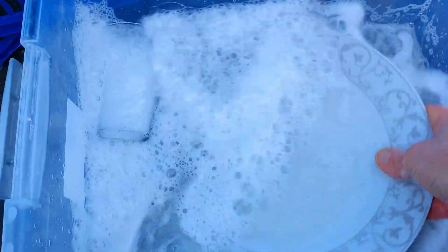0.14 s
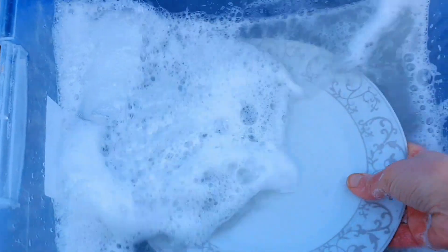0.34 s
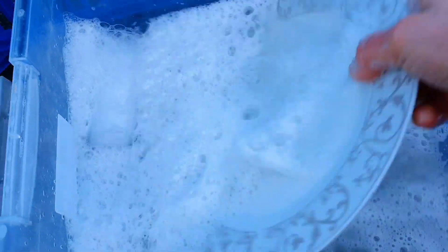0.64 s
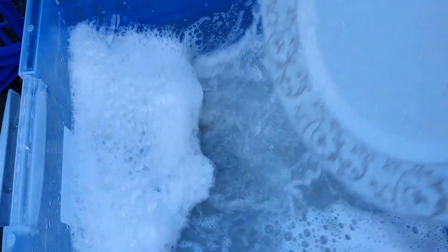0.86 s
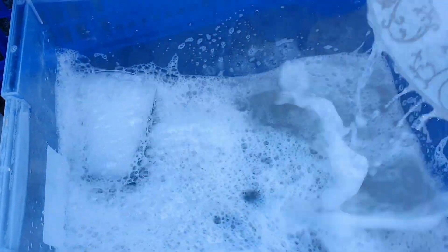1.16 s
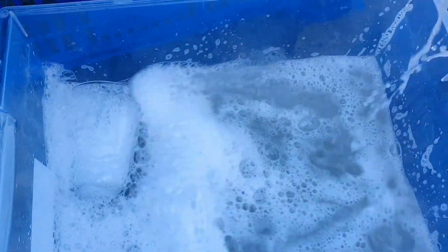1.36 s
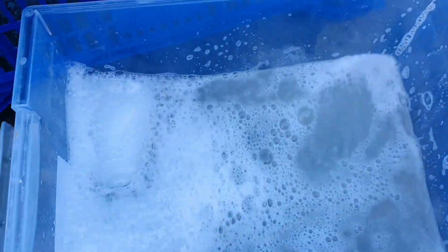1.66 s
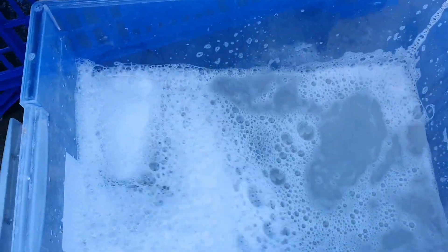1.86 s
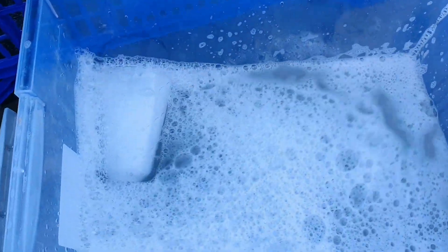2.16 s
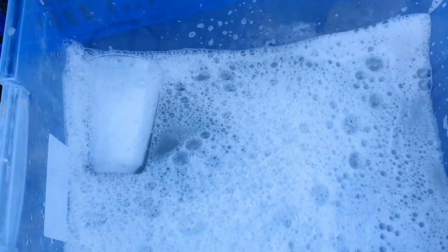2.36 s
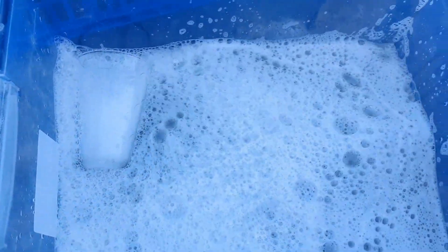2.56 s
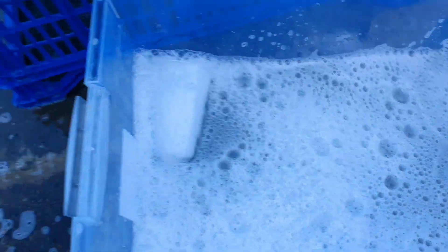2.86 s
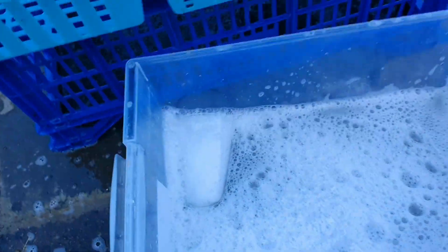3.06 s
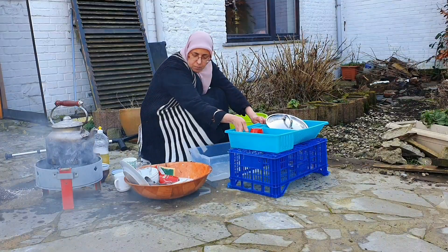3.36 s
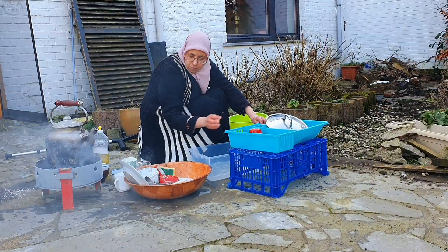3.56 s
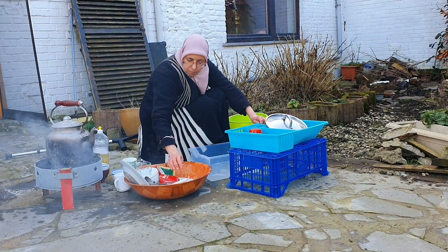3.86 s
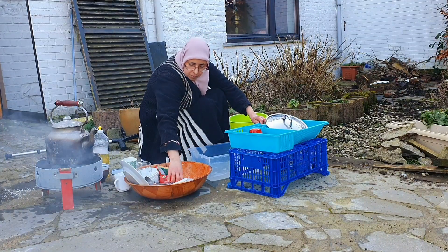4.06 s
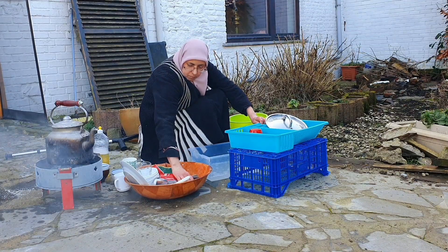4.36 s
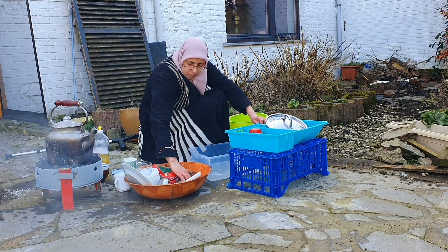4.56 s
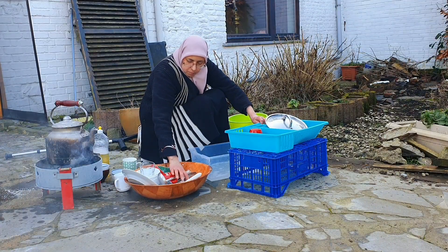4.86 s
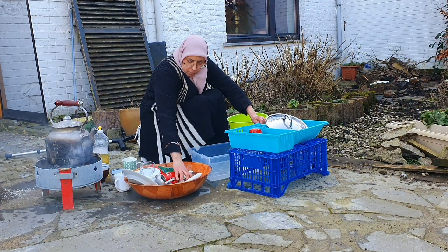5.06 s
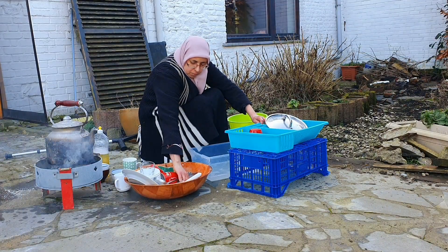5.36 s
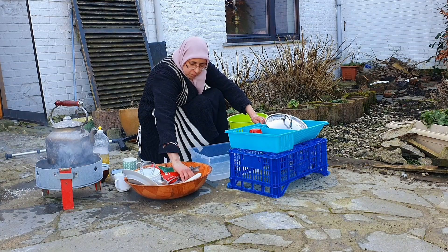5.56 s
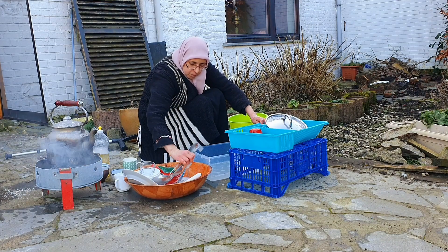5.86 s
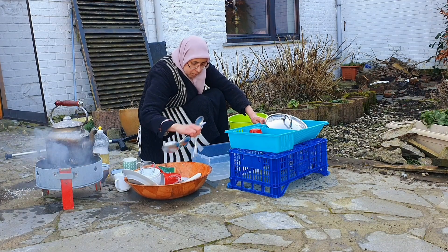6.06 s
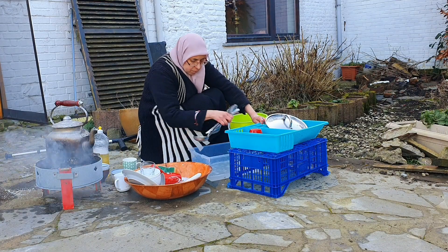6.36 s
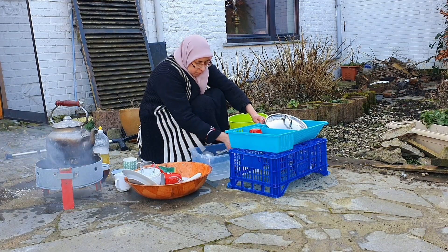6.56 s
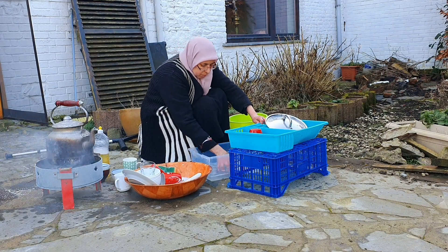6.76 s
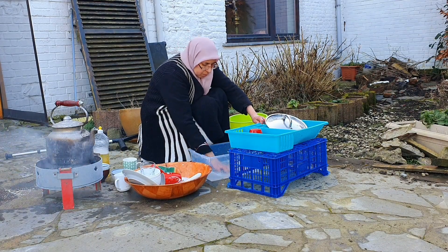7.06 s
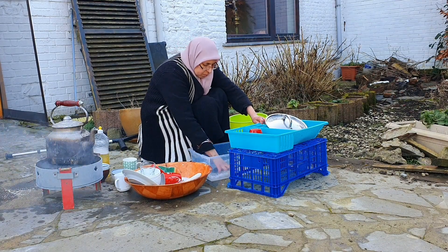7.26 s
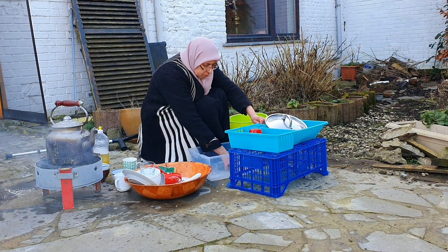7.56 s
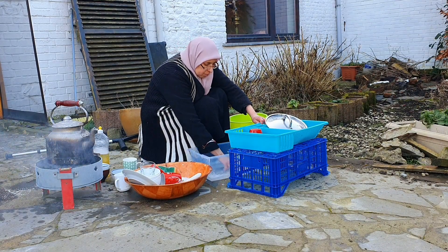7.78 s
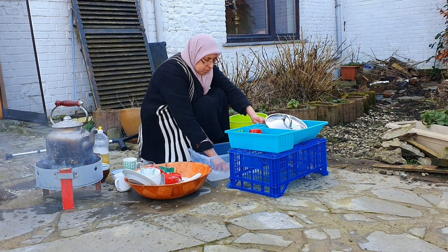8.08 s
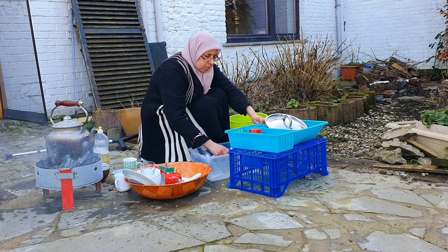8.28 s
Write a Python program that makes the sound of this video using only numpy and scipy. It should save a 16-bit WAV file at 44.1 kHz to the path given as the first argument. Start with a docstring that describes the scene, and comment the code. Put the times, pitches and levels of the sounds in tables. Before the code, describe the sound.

Soapy water sloshes and drips in a plastic tub as dishes are washed outdoors, with crockery clinking and cutlery jingling lightly.

```python
"""Dishes washed by hand in a paved yard, over a low machine hum and a faint hiss. First, soapy water
sloshes and slaps in a plastic tub. Near 2 s a far bird whistles, a cup is set down, a plate rattles onto
the stack and handled plastic gives hollow taps. From 4 s the water stirs again while cutlery scrapes and
jingles in a metal bowl; after 6 s come more slaps, plopping air pockets and a run of drips.
Water is fluttering noise and bubbles; crockery and steel are modes rung by a chatter of tiny contacts."""
import sys
import numpy as np
from scipy import signal
from scipy.fft import rfft, irfft, next_fast_len
from scipy.io import wavfile
from scipy.ndimage import uniform_filter1d, map_coordinates

SR = 44100
rng = np.random.default_rng(int(sys.argv[2]) if len(sys.argv) > 2 else 0)


def output_pcm(signal):
    """Save a mono or channel-first signal as 16-bit PCM at the path in sys.argv[1].

    Samples are clipped to [-1, 1] before scaling.
    """
    pcm = np.clip(np.atleast_2d(signal).T, -1, 1) * 32767
    wavfile.write(sys.argv[1], SR, np.round(pcm).astype(np.int16))


N = 371322

# spectra of the water's body, its fine spray and the tub's boom: f/Hz, level/dB
SLOSH_EQ = [(180, -23), (300, -5), (757, -1), (2140, -3), (4810, -8), (6580, -18), (9000, -47.5)]
SPRAY_EQ = [(3000, 0.5), (5000, -1.5), (7000, 2), (11000, -8.5), (15000, -10.5)]
BOOM_EQ = [(50, 2), (90, 3.5), (250, 3), (400, -0.5), (700, -29.5)]
# ringing modes of the cutlery: f/Hz, level/dB
STEEL_MODES = [(1850, -16), (4080, -18), (5770, -15), (6700, -12), (8980, -10), (9890, -10), (10460, -7),
               (12100, -6), (13700, -10), (14690, -7), (15400, -9)]


def amp(db):
    """Gain of a level in dB."""
    return 10 ** (np.asarray(db) / 20)


def unit(x):
    """Scaled to rms 1."""
    return x / np.sqrt(np.mean(x ** 2) + 1e-20)


def along(points, hz):
    """Read a curve of (f/Hz, value) points on a log frequency axis."""
    f, values = np.transpose(points)
    return np.interp(np.log(hz + 1), np.log(f + 1), values)


def curves(rows):
    """One automation curve for each column after the time."""
    times, *columns = np.transpose(rows)
    return [np.interp(np.arange(N) / SR, times, column) for column in columns]


def wobble(rate):
    """A smooth random curve, rate knots a second."""
    return map_coordinates(rng.standard_normal(int(N * rate / SR) + 4), [np.arange(N) * rate / SR])


def filtered(x, response):
    """Equalise x with a gain given as a function of frequency."""
    size = next_fast_len(x.shape[-1] + 4096)
    return irfft(rfft(x, size) * response(np.fft.rfftfreq(size, 1 / SR)), size)[..., :x.shape[-1]]


def add_at(track, s, sound):
    """Mix a stereo sound into the track at s seconds."""
    track[:, round(s * SR):][:, :sound.shape[1]] += sound


def spread(pair, eq):
    """Colour two unrelated signals and mix them to stereo, narrow in the bass, wider above; rms 1."""
    likeness = [(100, 0.91), (400, 1), (1500, 0.22), (6000, 0.48)]  # stereo image: f/Hz, left-right correlation

    def mid_side_gains(hz):
        angle = np.arccos(np.clip(along(likeness, hz), -1, 1)) / 2
        return amp(along(eq, hz)) * [np.cos(angle), np.sin(angle)]

    mid, side = filtered(pair, mid_side_gains)
    return unit(np.array([mid + side, mid - side]))


def puff(hold_s, eq):
    """A stereo burst of coloured noise: sudden attack, short hold, quick fall."""
    t = np.arange(SR // 8) / SR
    envelope = np.exp(-t / hold_s - (t / hold_s / 2) ** 2) * (1 - np.exp(-t / 0.00016))
    return spread(rng.standard_normal((2, len(t))), eq) * envelope


def patchy(depth_db):
    """Two noises sharing patches of random gain in time and frequency."""
    spectra = signal.stft(rng.standard_normal((2, N)), nperseg=256)[2]
    patches = uniform_filter1d(rng.standard_normal(spectra.shape[1:]), size=4, axis=0)
    patches = uniform_filter1d(patches, size=6, axis=1)
    return signal.istft(spectra * amp(depth_db * unit(patches)), nperseg=256)[1][:, :N]


def spikes(per_s, height):
    """Gain that jumps for a few milliseconds at each random droplet or contact."""
    chance, strength = rng.random((2, N))
    jumps = (chance < per_s / SR) * height * strength ** 2
    return 1 + signal.lfilter([1], [1, -np.exp(-1 / (0.0068 * SR))], jumps)


def yard():
    """The bed: steady hiss and rumble of the yard."""
    air_eq = [(25, -21.5), (71, 4), (107, -9), (235, -15.5), (362, -33.5), (603, -30.5), (4750, -35),
              (11000, -61), (14300, -99)]  # outdoor air: f/Hz, level/dB
    return amp(-49 + 0.44 * wobble(0.27)) * spread(rng.standard_normal((2, N)), air_eq)


def bird():
    """One far, falling whistle."""
    glide = [(1.66, 3850, -65.5), (1.75, 3730, -59.5), (1.85, 3320, -81)]  # path of the whistle: t/s, f/Hz, level/dB
    hz, db = curves([(0.029, glide[0][1], -150)] + glide + [(1.9, glide[-1][1], -150)])
    return amp(db) * np.sin(2 * np.pi * np.cumsum(hz) / SR)


def hum():
    """A machine drones on a slightly wandering pitch, a touch to the right."""
    fader = [(0, -38), (1.2, -46), (3.05, -47), (3.25, -42), (6.3, -41), (8.42, -39.5)]  # loudness of the drone: t/s, level/dB
    partials = [(59.8, 2), (119.6, -7), (181, -13)]  # its tones: f/Hz, level/dB
    warped_t = np.cumsum(1 + 0.0084 * wobble(4.5)) / SR
    tones = sum(amp(db + 0.56 * wobble(13.0)) * np.sin(2 * np.pi * hz * warped_t) for hz, db in partials)
    return amp(curves(fader)[0]) * tones * amp([[-.5], [.6]])


def wall(x):
    """Short reverb off wall and paving; the lows hang on longest."""
    decay = [(200, 0.24), (2000, 0.082), (10000, 0.077)]  # reverb time: f/Hz, t60/s
    hz, t, spectra = signal.stft(rng.standard_normal((2, SR // 3)), SR, nperseg=256)
    tail = signal.istft(spectra * amp(-60 * t / along(decay, hz)[:, None]), SR, nperseg=256)[1]
    predelayed = np.pad(x, ((0, 0), (400, 0)))
    return signal.fftconvolve(predelayed, tail / np.linalg.norm(tail[0]), axes=1)[:, :N]


def panned(x):
    """The work moves from side to side: level and arrival time differ between left and right."""
    moves = [(0, -0.5, 3.5), (.9, 0.5, 2.5), (1.5, -3.5, 14.5), (2.9, -3.5, 12.5), (3.6, 2.5, 7),
             (4, 0.5, -4), (6, 0, 3), (8.42, -0.3, -3.5)]  # position: t/s, left over right/dB, left lag/samples
    pan_db, lag = curves(moves)
    n = np.arange(N)
    return np.array([amp(side * pan_db / 2) * map_coordinates(channel, [n - side * lag / 2], order=3)
                     for channel, side in zip(x, (1, -1))])


def hollows(hits, t60, rise, roughness, overtone):
    """A small cavity sounds a brief, rough, rising note with an overtone."""
    out, t = np.zeros(N + SR), np.arange(SR // 10) / SR
    for s, db, hz in hits:
        jitter = roughness * unit(uniform_filter1d(rng.standard_normal(len(t)), size=60))
        phase = 2 * np.pi * hz * (t + rise * t * t + np.cumsum(jitter) / SR)
        envelope = amp(db - 60 * t / t60) * (1 - np.exp(-t / 0.0042))
        out[round(s * SR):][:len(t)] += envelope * (np.sin(phase) + overtone * np.sin(2.1 * phase))
    return out[:N]


def plastic_taps():
    """Handled plastic answers with hollow taps of almost steady pitch."""
    taps = [(2.31, -21.5, 893), (2.735, -37, 804), (2.85, -34.5, 845), (3.165, -35, 1510),
            (3.275, -29.5, 1826), (3.3055, -37, 1530)]  # touches on the plastic: t/s, level/dB, f/Hz
    return hollows(taps, t60=0.13, rise=0.1, roughness=0.13, overtone=0.16)


def ring(modes, chatter_s, scatter_db=3):
    """A chatter of tiny contacts drives modes (f/Hz, level/dB, t60/s), freshly balanced on each hit."""
    t = np.arange(SR // 8) / SR
    hz, db, t60 = np.transpose(modes)[:, :, None]
    strength, skew = rng.standard_normal((2, len(modes), 1))
    decay = amp(db + scatter_db * strength - 60 * t / t60)
    tone = np.array([(decay * np.sin(2 * np.pi * hz * t + side * 0.87 * skew)).sum(0)
                     for side in (1, -1)])
    contacts = rng.standard_normal((1, len(t))) ** 3 * np.exp(-(t / chatter_s) ** 4)
    contacts[0, 0] = .5 * np.linalg.norm(contacts)  # the first contact is the hardest
    return signal.fftconvolve(tone, contacts / np.linalg.norm(contacts), axes=1)[:, :len(t)]


def crockery(hits, modes, t60_at_3khz, ring_db):
    """Every contact rings the piece, grates its glaze, thuds on the crate below and cracks on top."""
    grit_eq = [(500, -31.0), (1000, 1.5), (2500, 7.5), (5000, -3.0), (8000, -35.0)]  # f/Hz, level/dB
    crate_eq = [(70, -10.0), (150, 6.0), (500, 11.5), (900, 12.5), (1400, -50.0)]
    crack_eq = [(3000, -2.0), (7000, 13.5), (15000, -19.0)]
    out = np.zeros((2, N + SR))
    for s, db, thud_db, treble_db, chatter_s in hits:
        voiced = [(hz, level + (treble_db + 24) * (hz > 6000), t60_at_3khz * (3000 / hz) ** 0.18)
                  for hz, level in modes]
        tone = amp(ring_db) * ring(voiced, chatter_s)
        grit = amp(-15) * puff(0.7 * chatter_s, grit_eq)
        thud = amp(thud_db - 9.5) * (puff(0.016, crate_eq) + amp(-15) * puff(0.031, BOOM_EQ))
        crack = amp(treble_db - 1.5) * puff(0.003, crack_eq)
        add_at(out, s, amp(db) * (tone + grit + thud + crack))
    return out[:, :N]


def cup():
    """A cup is set down and rings; then a held cup knocks the crate, damped by the fingers."""
    modes = [(1200, -10), (2004, -1), (2270, -10), (3052, -7), (3973, -12), (4900, -20), (6500, -30),
             (7450, -28), (10010, -24)]  # resonances of the cup: f/Hz, level/dB
    # contacts, set down and held: t/s, level/dB, relative thud/dB, relative treble/dB
    set_down = [(1.8435, 5, -18, -20.5), (1.8617, -19, 0.5, -13), (1.8845, -2.5, -12.5, -25)]
    knocks = [(1.9951, -14.5, -9, -28), (2.0069, 0, -10.5, -45.5), (2.082, -31.5, 5.5, -53),
              (2.16, -33.5, 11.5, -36), (2.1819, -36, 9, -35), (2.3104, -24.5, -1, -36)]
    free_chatter_s, held_chatter_s = 0.01, 0.0043
    gripped = [(hz, db + 14 * (2100 < hz < 2400)) for hz, db in modes]  # the grip favours one mode
    free = crockery([(*hit, free_chatter_s) for hit in set_down], modes, t60_at_3khz=0.08, ring_db=-9.5)
    held = crockery([(*hit, held_chatter_s) for hit in knocks], gripped, t60_at_3khz=0.03, ring_db=-5.5)
    return free + held


def plate():
    """A plate rocks on the stack, ringing at every contact."""
    modes = [(715, -8), (860, -8), (1542, -7), (2040, -3), (2480, -8), (2875, -8), (3090, 1), (3148, -2),
             (3640, -11), (4140, -11), (5025, -6), (6730, -19), (7440, -21), (8270, -26), (9000, -28),
             (10020, -26), (11940, -31), (12970, -33)]  # resonances of the plate: f/Hz, level/dB
    # contacts with the stack: t/s, level/dB, relative thud/dB, relative treble/dB, chatter/s
    rattle = [(1.0652, -21, -32, -26, 0.064), (2.3412, -2, 1, -11, 0.034), (2.3517, 1.5, -6.5, -32, 0.078),
              (2.375, -25.5, -13, -30, 0.0045), (2.3954, -11.5, -2, -15, 0.0076),
              (2.4462, -2.5, -7, -16, 0.0081), (2.4709, -3.5, -15, -22, 0.0087),
              (2.4874, -6.5, -3.5, -22, 0.035), (2.4985, 0, -29, -20, 0.023), (2.5601, -4.5, -9, -25, 0.02),
              (2.6534, -13, -5.5, -47, 0.0068)]
    return crockery(rattle, modes, t60_at_3khz=0.08, ring_db=-11.5)


def cutlery_jingle(t60=0.052):
    """A touch rings one piece clearly and its neighbours faintly, with a short scrape."""
    touches = [(4.335, -16, 14200), (4.518, -20, 10980), (5.276, -35.5, 10300), (5.3647, -26.5, 15000),
               (5.53, -31, 11900), (5.745, -26, 10470), (5.833, -18, 12030), (5.8509, -29.5, 10500),
               (5.9019, -26, 6650), (6.547, -26, 14260)]  # steel meeting steel: t/s, level/dB, main mode f/Hz
    neighbours = [(hz, db + 0.5, t60) for hz, db in STEEL_MODES]
    out = np.zeros((2, N + SR))
    for s, db, hz in touches:
        clink = ring([(hz, 0, t60)] + neighbours, chatter_s=0.039)
        add_at(out, s, amp(db - 2) * (clink + amp(-5.5) * puff(0.05, SPRAY_EQ)))
    return out[:, :N]


def cutlery_scrape(blur_hz=45, rasp_db=-21, swing_db=6):
    """Steel rubs on steel: clumps of contacts rasp and excite three pieces that come and go."""
    def resonances(f):
        return [[sum(amp(db) / (1 + 1j * (f - hz) / blur_hz) for hz, db in STEEL_MODES[piece::3])]
                for piece in range(3)]

    friction = patchy(depth_db=1.0) * spikes(per_s=100, height=3)
    rub = spread(friction, [(1000, -72.0), (1600, 9.5), (15000, -3.5)])
    presence = amp(swing_db * (np.array([[wobble(20)] for _ in range(3)]) - 1))
    return unit(amp(rasp_db) * rub + (presence * filtered(rub, resonances)).sum(0))


def drips(q=21, tick_db=-12.5):
    """Each drip is a short push of noise that rings an air pocket and leaves a broad tick."""
    landings = [(0.3716, -14, 1290), (0.397, -4, 1440), (0.5432, -5, 1970), (0.5614, -1, 2700),
                (0.7317, -1.5, 2470), (1.1722, -33, 2160), (1.3578, -30, 3500), (2.801, -33, 1590),
                (3.2244, -32, 2030), (4.2577, -11.5, 1840), (4.5186, -11, 3600), (4.6324, -15, 2820),
                (5.4889, -15.5, 1920), (5.8531, -8.5, 4370), (6.3634, -41.5, 4200), (6.546, -18.5, 3730),
                (6.6014, -17.5, 3890), (6.8279, -23, 1820), (6.8843, -23, 1620), (6.9237, -22, 3440),
                (7.1616, -22, 2170), (7.194, -21, 3150), (7.2933, -23, 3180), (7.3667, -25.5, 3820),
                (7.4654, -23, 1900), (7.4909, -15.5, 2470), (7.5737, -21, 2730), (7.8336, -14, 1780),
                (7.9344, -29.5, 2100), (8.0187, -25, 3120)]  # drips and small splashes: t/s, peak/dB, pocket f/Hz
    out = np.zeros((2, N + SR))
    for s, db, hz in landings:
        push = puff(0.0068, [(400, -14.5), (1500, 2), (15000, -21)])
        plink = filtered(push, lambda f: amp(tick_db) + 1 / (1 + 1j * q * ((f + 1) / hz - hz / (f + 1))))
        add_at(out, s, amp(db) * plink / np.abs(plink).max())
    return out[:, :N]


def plops():
    """Air pockets under the hand rise in pitch as they close."""
    pockets = [(0.371, -13, 331), (0.658, -11, 728), (0.737, -10, 850), (0.772, -8.5, 776),
               (4.228, -9, 512), (4.285, -14, 610), (6.426, -10, 290), (6.516, -17, 302), (6.611, -20, 900),
               (6.708, -15, 978), (7.014, -13, 360), (7.085, -21, 878), (7.146, -19, 731),
               (7.357, -18.5, 396), (7.437, -12, 431), (8.087, -27, 417)]  # trapped air: t/s, level/dB, f/Hz
    return hollows(pockets, t60=0.058, rise=3.43, roughness=0.1, overtone=0.45)


def slaps(crest_db=13.5):
    """Water slaps the tub: a quick broad burst with a bright splash on top."""
    hits = [(0.066, -9.5, -13.5), (0.295, -9, -15), (0.494, -0.5, -26), (0.543, 0, -12.5),
            (0.574, -5, -8.5), (0.732, -5, -10), (4.41, -20, 7), (4.471, -14, -3), (4.721, -15.5, -38),
            (5.337, -11, -11), (5.835, -12, -28.5), (6.4, -17.5, 0.5), (6.461, -20, 10.5),
            (6.504, -16.5, 0), (6.642, -5.5, 4.5), (6.681, -9.5, -2), (7.014, -10.5, -11),
            (7.241, -9.5, -12.5), (7.642, -12, -3), (7.7, -9, -7), (7.736, -7, -10)]  # slaps and knocks in the tub: t/s, level/dB, relative treble/dB
    out = np.zeros((2, N + SR))
    for s, db, treble_db in hits:
        burst = puff(0.014, SLOSH_EQ) + amp(treble_db) * puff(0.023, SPRAY_EQ)
        add_at(out, s, amp(db - crest_db) * burst)
    return out[:, :N]


def bubbles(count, hz, log_spread, cycles, scatter_db, samples):
    """Two clouds of the same bubbles at unrelated gains: damped sines that rise as they die."""
    onset, strength = rng.random((count, 2)).T[:, :, None]
    detune, *gains = rng.standard_normal((count, 3)).T[:, :, None]
    t = np.arange(samples) / SR
    pitch = np.clip(hz * np.exp(log_spread * detune), 300, 15000)
    age = t * pitch / cycles
    envelope = amp(-scatter_db * np.log(strength + 0.014)) * np.exp(-age) * (1 - np.exp(-8 * age))
    chirps = envelope * np.sin(2 * np.pi * pitch * t * (1 + 0.1227 * age))
    slots = ((onset * N).astype(int) + np.arange(samples)).ravel()
    return unit(np.array([np.bincount(slots, (chirps * gain).ravel(), N + samples)[:N] for gain in gains]))


def stirring_db(swing_db=20):
    """Level of the water: each stroke swells and fades by swing_db over the settling foam."""
    strokes = [(0.079, -24.5, 0.019, 0.19), (0.409, -20, 0.15, 0.36), (0.562, -22.5, 0.25, 0.35),
               (0.746, -17, 0.045, 0.099), (0.778, -12, 0.048, 0.04), (0.962, -31.5, 0.38, 0.062),
               (1.126, -39.5, 0.16, 0.012), (2.813, -45.5, 0.38, 0.15), (3.3, -46, 1, 0.091),
               (4.244, -21.5, 0.21, 0.18), (4.362, -25, 0.19, 0.09), (4.513, -33.5, 0.1, 0.23),
               (4.639, -25, 0.051, 0.086), (4.733, -32, 0.095, 0.13), (4.981, -39, 0.17, 0.077),
               (5.287, -31, 0.18, 0.32), (5.5, -31, 0.022, 0.11), (5.698, -40, 0.032, 0.24),
               (5.93, -35.5, 0.31, 0.19), (6.441, -27.5, 0.045, 0.079), (6.542, -24.5, 0.023, 0.05),
               (6.652, -19.5, 0.066, 0.13), (6.916, -32.5, 0.31, 0.34), (7.024, -31, 0.049, 0.4),
               (7.253, -31.5, 0.046, 0.24), (7.452, -27.5, 0.041, 0.19), (7.663, -28.5, 0.0093, 0.46),
               (7.841, -29.5, 0.19, 0.026), (7.933, -28, 0.034, 0.046), (8.401, -42.5, 0.18, 0.076)]  # hand or dish through the water: peak t/s, level/dB, swell/s, fade/s
    settling = [(0, -51), (1.2, -75), (1.4, -53.5), (1.8, -56.5), (3.4, -54), (3.95, -60), (5.05, -66),
                (6.3, -57.5), (8.42, -93)]  # water and foam left alone: t/s, level/dB
    t = np.arange(0, N / SR, 1 / 1000)
    peak_s, db, swell, fade = np.transpose(strokes)[:, :, None]
    surges = amp(db - swing_db * np.where(t < peak_s, (peak_s - t) / swell, (t - peak_s) / fade))
    power = (surges ** 2).sum(0) + amp(np.interp(t, *np.transpose(settling))) ** 2
    return np.interp(np.arange(N) / SR, t, 10 * np.log10(power))


def washing():
    """Strokes drive slosh, spray, tub boom and loose cutlery; the water flutters as droplets break."""
    balance = [(.1, -11, -12), (.42, -33, -3), (.6, -9.5, -15.5), (1.13, -12, -11), (1.25, 6.5, -3),
               (1.8, -44, -1.5), (2.7, -27, -6), (2.76, -3.5, 1.5), (3.3, -15.5, -3), (3.6, -39.5, -11),
               (3.9, -17.5, -7), (4.09, 2.5, -32), (5.12, -9.5, -11.5), (5.77, 0, -20), (6.33, -14, 0),
               (6.43, -3, 1.5), (6.8, -15, -9), (7.39, -15.5, -2.5), (8.1, -8.5, -11.5)]  # top and bottom against the slosh: t/s, spray/dB, boom/dB
    rummage = [(4, -30), (4.1, 0.5), (5.2, 3), (5.7, 8), (5.95, 9), (6.1, -27)]  # stirred cutlery against the spray: t/s, level/dB
    spray_db, boom_db = curves(balance)
    flutter = amp(1.5 * wobble(40) + 1.9 * wobble(90))
    droplets = spikes(per_s=90, height=2.5)

    churn = spread(patchy(depth_db=3.5), SLOSH_EQ)
    burble = bubbles(5000, hz=1606, log_spread=0.592, cycles=2.9, scatter_db=-7, samples=300)
    gurgle = bubbles(900, hz=760, log_spread=0.35, cycles=4.45, scatter_db=3, samples=900)
    flat_eq = [(300, 0)]
    slosh = churn + 0.31 * spread(burble, flat_eq) + 0.39 * spread(gurgle, flat_eq)
    slosh = unit(flutter * np.sqrt(droplets) * slosh)

    crackle = bubbles(2500, hz=7750, log_spread=0.6, cycles=0.82, scatter_db=10, samples=60)
    hiss = patchy(depth_db=-1.0)
    fizz = bubbles(1800, hz=4870, log_spread=0.77, cycles=2.2, scatter_db=6.5, samples=200)
    spray = spread(0.3 * crackle + hiss + 0.84 * fizz, SPRAY_EQ)
    spray = unit(flutter * droplets ** 1.19 * spray)

    steel = amp(curves(rummage)[0]) * cutlery_scrape()
    boom = flutter * spread(rng.standard_normal((2, N)) * amp(2.3 * wobble(11)), BOOM_EQ)
    return amp(stirring_db()) * (slosh + amp(spray_db) * (spray + steel) + amp(boom_db) * boom)


def scene():
    """The mix: only the hits feed the reverb; all the work is panned over the still background."""
    hits = cup() + plate() + cutlery_jingle() + slaps() + drips() + plops() + plastic_taps()
    work = hits + amp(-11.5) * wall(hits) + washing()
    return panned(work) + hum() + yard() + bird()


def record(dry, ceiling=0.9, low_cut_hz=30, top_hz=15900):
    """Soft-clip the loudest peaks, roll off the deepest bass and cut the very top."""
    clipped = dry / (1 + np.abs(dry / ceiling) ** 4) ** (1 / 4)
    return filtered(clipped, lambda hz: (hz < top_hz) / (1 + (low_cut_hz / (hz + 1)) ** 4))


dry = scene()
out = record(dry)
output_pcm(out)
```